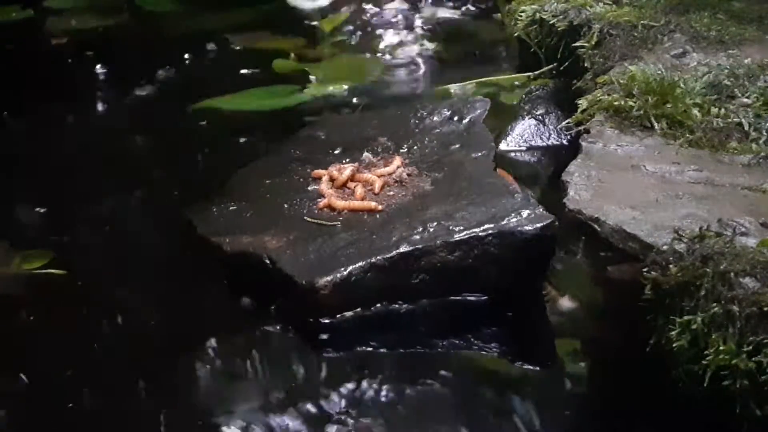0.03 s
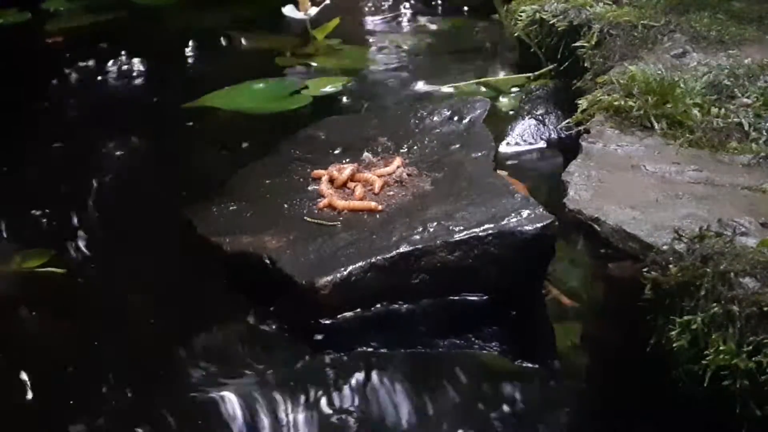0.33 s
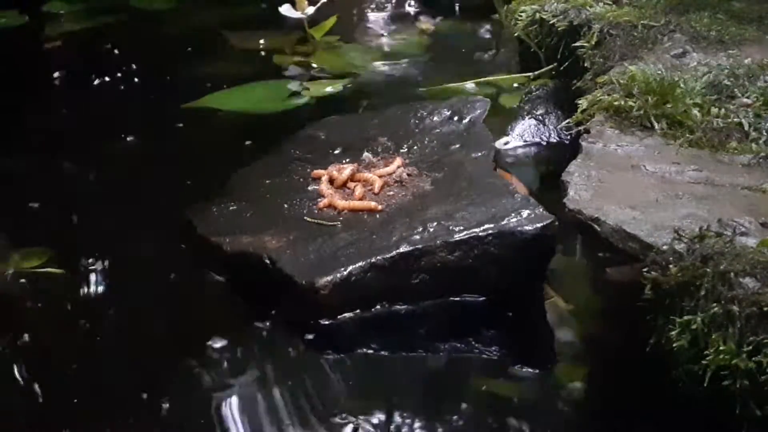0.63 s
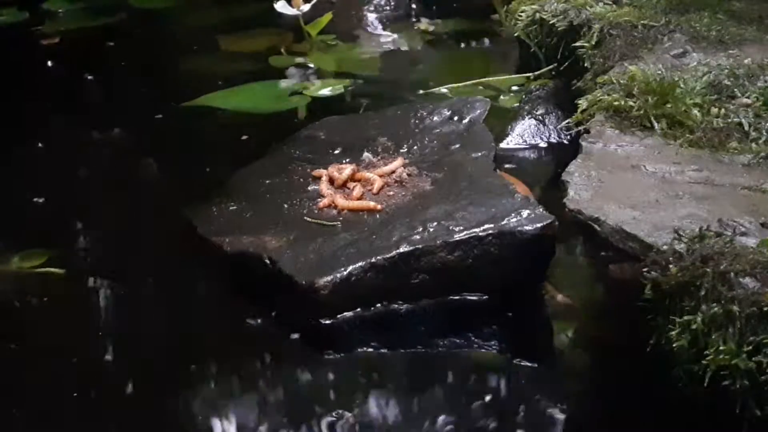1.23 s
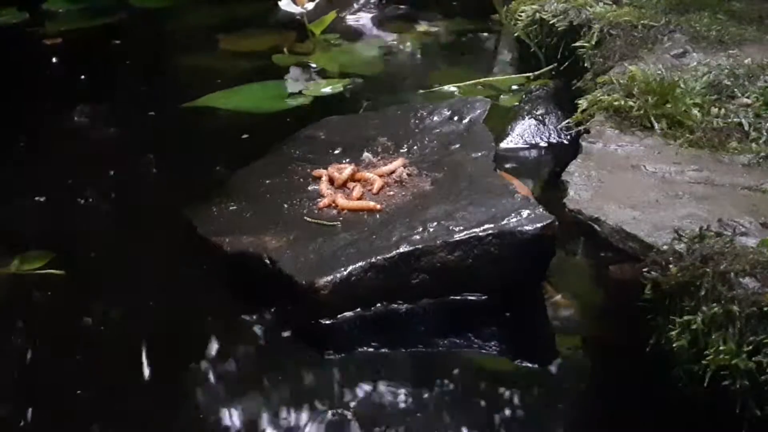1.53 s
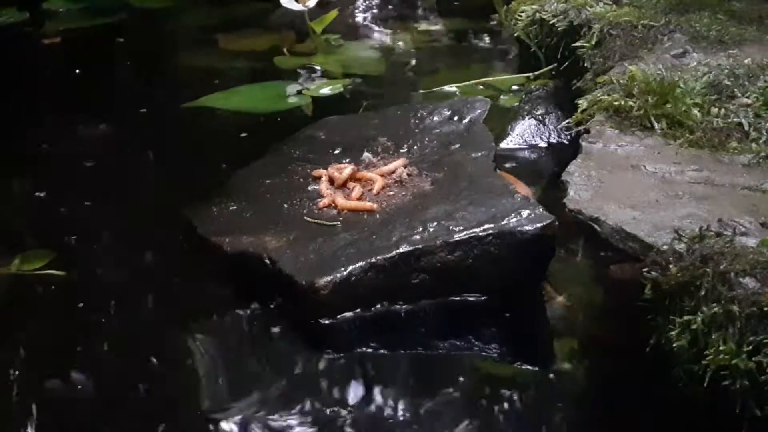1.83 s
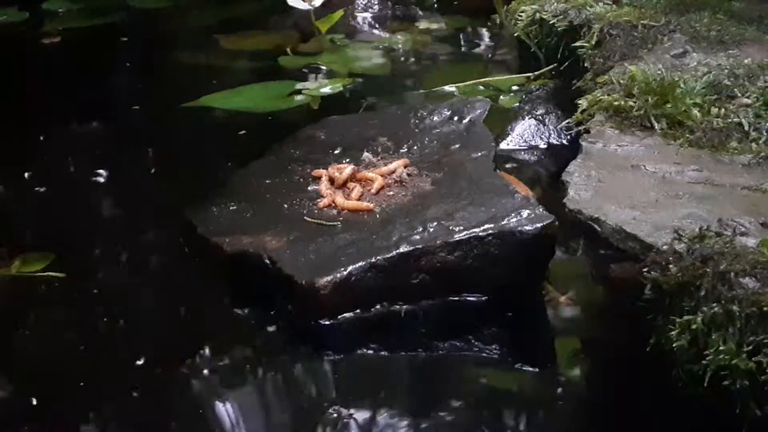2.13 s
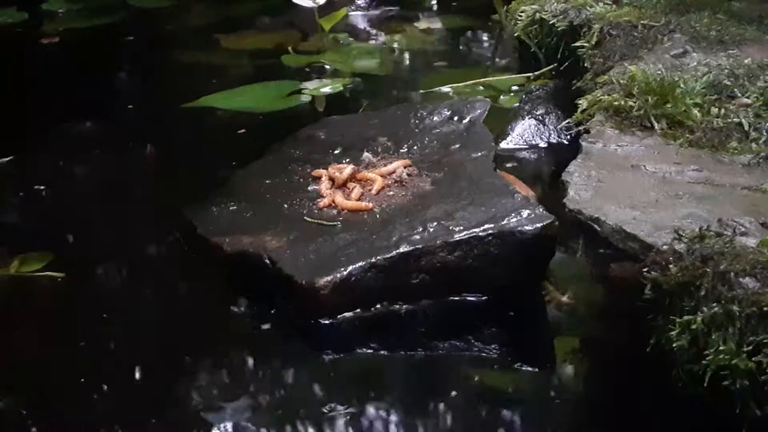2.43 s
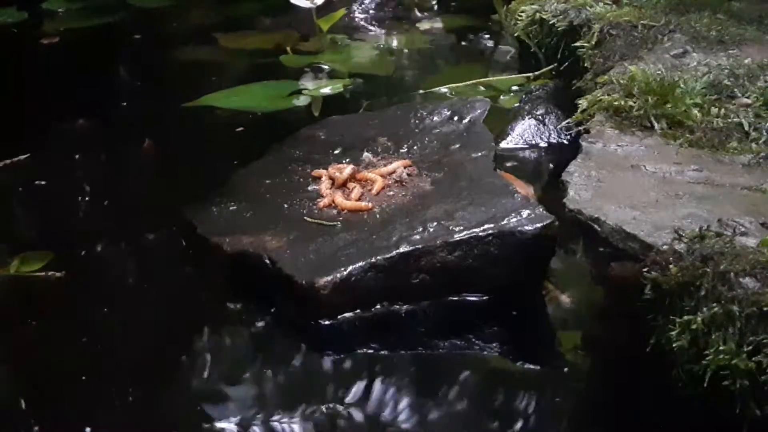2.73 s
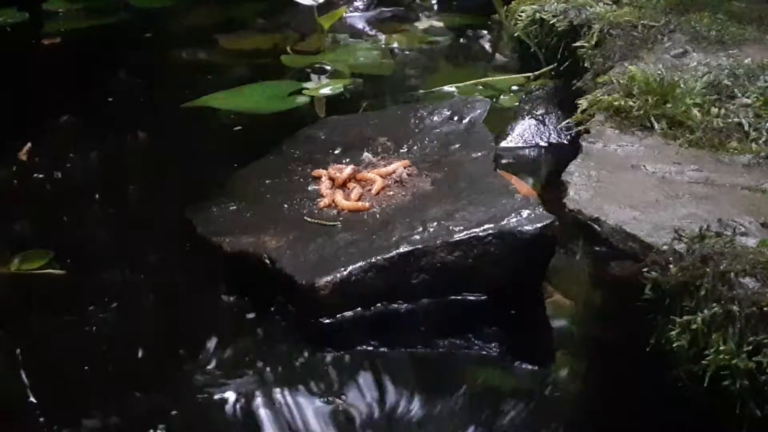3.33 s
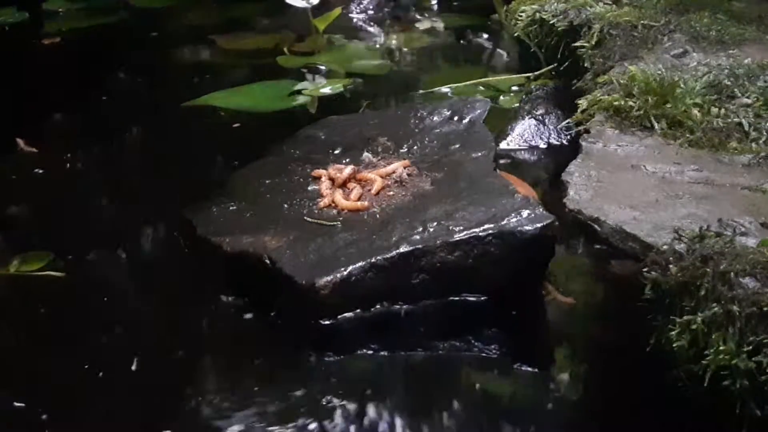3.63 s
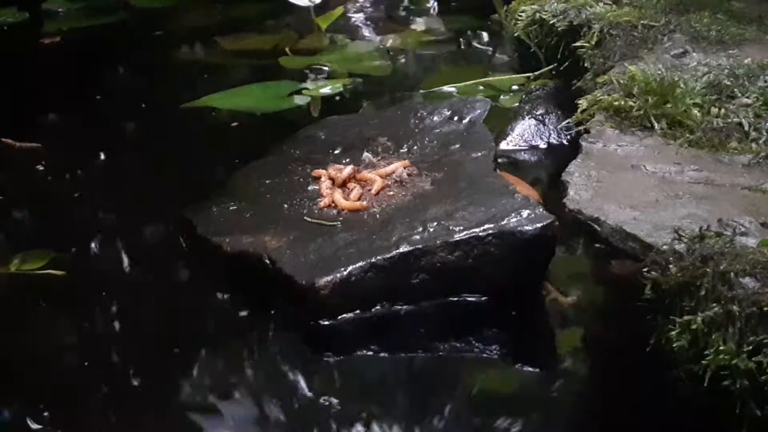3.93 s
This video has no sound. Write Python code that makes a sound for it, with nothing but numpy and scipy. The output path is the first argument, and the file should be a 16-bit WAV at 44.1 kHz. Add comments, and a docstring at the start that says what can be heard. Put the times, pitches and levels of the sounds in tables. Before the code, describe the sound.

A bullfrog bellows three times at a pond, close and slightly left, at about 1.3, 2.2 and 3.1 seconds. Each call lasts under half a second, starting gruff, then booming and rasping, with a slight echo. Tiny splashes tick in the first 0.8 seconds. Faint birds whistle far off over a low rumble, while a distant engine slowly rises in pitch and level until the end at 4 seconds.

```python
"""A low rumble, small splashes and far birds are heard first, while a distant engine gathers speed.
Then a bullfrog bellows three times at the rocky edge of a garden pond. Each call is a train of pulses
filtered by the resonances of vocal sac, throat and eardrums: it starts gruff, booms, and rasps at its
loudest. Near rocks and farther banks reflect it. A faint background hiss swells while each call sounds."""
import sys
import numpy as np
from scipy import signal
from scipy.fft import rfft, irfft
from scipy.io import wavfile
from scipy.ndimage import uniform_filter1d

SR = 44100
rng = np.random.default_rng(int(sys.argv[2]) if len(sys.argv) > 2 else 0)


def materialize(psi):
    """Save the field psi as 16-bit PCM at rate SR to the path in sys.argv[1].

    A 1-D psi becomes a single channel; in a 2-D psi each row is a channel.
    """
    bounded = np.clip(np.atleast_2d(psi).T, -1, 1)
    quanta = np.round(bounded * 32767).astype(np.int16)
    wavfile.write(sys.argv[1], SR, quanta)


N = 176400
T = np.arange(N) / SR
HZ = np.fft.rfftfreq(N, 1 / SR)


def amp(db):
    """Amplitude ratio: tenfold for every 20 dB."""
    return 10 ** (np.asarray(db) / 20)


def unit(x):
    """Normalisation to rms 1."""
    return x / np.sqrt(np.mean(x ** 2) + 1e-20)


def curve(points, hz):
    """Interpolation on a log-frequency axis."""
    f, value = np.transpose(points)
    return np.interp(np.log(hz + 1), np.log(f + 1), value)


def filtered(x, gain):
    """Linear filtering: the spectrum is multiplied by a frequency response."""
    return irfft(rfft(x) * gain, x.shape[-1])


def add(mix, start_s, sound):
    """Superposition of a sound on the mix."""
    part = mix[..., max(round(start_s * SR), 0):][..., :sound.shape[-1]]
    part += sound[..., :part.shape[-1]]


def drift(size, rate_hz):
    """Slow random modulation: low-passed noise of rms about 1."""
    return unit(filtered(rng.standard_normal(N), np.exp(-(HZ / rate_hz) ** 2)))[:size]


def ear_gains(balance):
    """Interaural level difference, split evenly between the ears."""
    return amp(np.outer([.5, -.5], curve(balance, HZ)))


def left_leads(x, lead_s):
    """Interaural time difference: a positive lead reaches the left ear first."""
    return filtered(x, np.exp(2j * np.pi * np.outer([.5, -.5], HZ) * lead_s))


def reverb(x, decay):
    """Reverberation: sparse reflections for each ear, decaying by rows of (frequency_hz, t60_s)."""
    taps = rng.standard_normal((2, SR)) * (rng.random((2, SR)) < 3000 / SR)
    taps[:, :60] = 0
    hz, t, bands = signal.stft(taps, SR, nperseg=256)
    tail = signal.istft(bands * amp(-60 * t / curve(decay, hz)[:, None]), SR)[1]
    tail /= np.linalg.norm(tail, axis=1, keepdims=True)
    return signal.fftconvolve(np.atleast_2d(x), tail, axes=1)[:, :N]


# Likeness of the surrounding sound at the two ears: frequency_hz, coherence
FIELD_COHERENCE = [(50,0.95),(200,1),(500,0.91),(1000,0.23),(2000,0.24),(4000,0.19),(15000,0.064)]
# Its balance: frequency_hz, left_minus_right_db
FIELD_BALANCE = [(60,0.6),(300,0.2),(1000,-1.5),(4000,-1),(14000,-3.5)]

def diffuse(pair):
    """Diffuse field: long waves reach both ears alike, short waves are nearly incoherent."""
    a, b = rfft(pair)
    coherence = curve(FIELD_COHERENCE, HZ)
    right = coherence * a + np.sqrt(1 - coherence ** 2) * b
    return irfft(np.array([a, right]) * ear_gains(FIELD_BALANCE), N)


def diffuse_noise(spectrum):
    """Spectral shaping of diffuse white noise, at rms 1."""
    return unit(filtered(diffuse(rng.standard_normal((2, N))), amp(curve(spectrum, HZ))))


# Spectrum of the background air: frequency_hz, relative_density_db
AIR_SPECTRUM = [(12,-83),(20,-33.5),(35,-25.5),(57,-3.5),(81,1.5),(125,-3),(162,-2),(215,-7.5),(330,-11.5),(443,-20),(750,-21.5),(1300,-25.5),(2100,-34),(3700,-34),(5600,-34),(6700,-41.5),(7900,-44.5),(10000,-42),(11600,-41),(15800,-40.5)]

def air(level_db=-46.5):
    """Ambient noise: a distant rumble under a thin, even hiss."""
    return diffuse_noise(AIR_SPECTRUM) * amp(level_db)


# Spectrum of the swelling background hiss: frequency_hz, relative_density_db
HISS_SPECTRUM = [(1500,3.5),(3500,3),(5300,-8),(7000,-1.5),(10000,-8),(15500,-12.5)]

def background_hiss(swell):
    """Amplitude modulation: a faint background hiss swells while each call sounds."""
    return swell * unit(filtered(rng.standard_normal((2, N)), amp(curve(HISS_SPECTRUM, HZ))))


# Bands of the farthest birdsong: start_s, end_s, centre_hz, width_hz, level_db
TWITTER_BANDS = [(0,0.952,3520,454,-75),(1.767,3.503,2705,100.6,-69.5),(2.003,3.554,3740,200,-70)]

def twitter(fade_s=0.2):
    """Narrow-band noise: the notes of many distant birds merge."""
    out = np.zeros((2, N))
    for start, end, centre_hz, width_hz, db in TWITTER_BANDS:
        band = filtered(rng.standard_normal((2, N)), np.exp(-.5 * ((HZ - centre_hz) / width_hz) ** 2))
        fade = np.clip(np.minimum(T - start, end - T) / fade_s, 0, 1)
        out += amp(db) * unit(band) * fade
    return out


# Far bird whistles: start_s, length_s, from_hz, to_hz, relative_level_db
BIRD_NOTES = [(0.005,0.055,2700,2735,-62.5),(0.162,0.079,3550,3600,-70),(0.175,0.068,2800,2750,-70),(.34,.08,2900,3400,-76),(0.441,.11,3970,3730,-66),(0.487,.06,3490,2580,-64.5),(0.547,.1,3870,3850,-67),(0.677,0.019,3620,3610,-60.5),(0.712,0.073,3750,2930,-68),(1.249,0.027,3980,3930,-62),(1.322,0.076,3890,4020,-68),(1.782,.1,3680,3880,-71),(2.073,0.1,3690,3960,-70),(2.558,0.24,3730,3520,-71.5),(2.88,0.12,3720,3725,-73)]

def birds(warble=.035, echo_db=3.5):
    """Frequency modulation: thin whistles glide and warble, blurred by scattering in the trees."""
    song = np.zeros(N)
    for start, length, from_hz, to_hz, db in BIRD_NOTES:
        size = int(length * SR)
        hz = np.linspace(from_hz, to_hz, size) * (1 + warble * drift(size, 190))
        whistle = np.sin(2 * np.pi * np.cumsum(hz) / SR)
        add(song, start, amp(db) * whistle * signal.windows.tukey(size, .5))
    return 1.1 * song + amp(echo_db) * reverb(song, [(3000, 0.2)])


# Course of the exhaust note: time_s, pitch_hz, level_db
EXHAUST_NOTE = [(0,262,-82),(.5,288.6,-69.5),(1,311.4,-60.5),(1.5,329.9,-58.5),(2,342.4,-56.5),(2.5,346.9,-52),(2.85,350.4,-62.5),(3.1,348,-48.5),(3.55,367.3,-47.5),(3.72,360,-47.5),(3.87,361.8,-47),(4,363.4,-49)]
# Its second and third harmonics: relative_level_db
EXHAUST_OVERTONES = [-25.5, -25]
# Spectrum of the engine's roar: frequency_hz, relative_density_db
ROAR_SPECTRUM = [(100,-18.5),(330,-1),(700,-4.5),(1200,-8.5),(2500,-17),(6000,-52.5)]

def engine(waver=0.0039, flutter_db=3.0, roar_db=-66, growth_db_per_s=3):
    """Harmonic series: a far exhaust note climbs with engine speed and flutters over a growing roar."""
    times, hz, level_db = np.transpose(EXHAUST_NOTE)
    pitch_hz = np.interp(T, times, hz) * (1 + waver * drift(N, 25.7))
    phase = 2 * np.pi * np.cumsum(pitch_hz) / SR
    note = np.sin(phase) + sum(amp(db) * np.sin(k * phase) for k, db in enumerate(EXHAUST_OVERTONES, 2))
    roar = diffuse_noise(ROAR_SPECTRUM) * amp(roar_db + growth_db_per_s * T)
    return unit(note) * amp(np.interp(T, times, level_db) + flutter_db * drift(N, 39)) + roar


# Wet ticks at the water's edge: start_s, centre_hz, width_octaves, level_db, t60_s
SPLASH_TICKS = [(.014,1870,0.35,-40,0.041),(.015,4630,0.69,-45,0.051),(.109,8550,0.7,-51.5,0.074),(.283,2120,.35,-52.5,0.047),(.416,13000,0.56,-50.5,.025),(0.449,12000,0.46,-53.5,0.038),(.49,12000,.6,-57,0.059),(.606,5900,0.13,-52.5,0.026),(0.759,5760,0.24,-54,0.027)]

def splashes(rise_s=0.00058):
    """Damped transients: each splash is a band of noise that decays exponentially."""
    out, t = np.zeros((2, N)), T[:SR // 8]
    hz = np.fft.rfftfreq(len(t), 1 / SR) + 1
    for start, centre_hz, octaves, db, t60 in SPLASH_TICKS:
        colour = np.exp(-.5 * (np.log2(hz / centre_hz) / octaves) ** 2)
        spray = unit(filtered(rng.standard_normal((2, len(t))), colour))
        add(out, start, spray * np.minimum(t / rise_s, 1) * amp(db - 60 * t / t60))
    return out


# Resonances of sac, throat and eardrums at the pulse rate REST_HZ: frequency_hz, gain_db
RESONANCES = [(60,-43.5),(120,-29),(245,-22.5),(300,-25.5),(360,0),(400,-0.5),(480,-11),(540,-12),(605,-15.5),(660,-23.5),(730,-40.5),(830,-29.5),(900,-23),(970,-11.5),(1080,-18.5),(1220,-25),(1330,-17),(1450,-15),(1580,-14.5),(1690,-22.5),(1820,-37),(2020,-24),(2150,-28),(2270,-28.5),(2380,-53),(2560,-39),(3100,-60.5),(4200,-78.5),(8000,-87)]
# How far each resonance follows the pitch: frequency_hz, tracking_share
PITCH_TRACKING = [(400,0.34),(1000,0.05),(1450,0.94),(2300,0.24)]
REST_HZ = 121

def pulses(cycles, rate_hz, sweep_s_per_khz=0.0017):
    """Source and filter: the harmonics of a pulse train are weighted by the frog's resonances."""
    k = np.arange(1, 50)[:, None]
    harmonic_hz = k * REST_HZ
    # dispersion: within a pulse the high tones come first
    sweep = sweep_s_per_khz * (harmonic_hz ** 2 / 2000 - harmonic_hz)
    tuning = (rate_hz / REST_HZ) ** curve(PITCH_TRACKING, harmonic_hz)
    colour = amp(curve(RESONANCES, k * rate_hz / tuning))
    return (colour * np.cos(2 * np.pi * (k * cycles + sweep))).sum(0)


def puffs(cycles, hz, spread_cycles=0.39, highpass_hz=800, gain_db=-4):
    """Gated turbulence: air let through with each pulse excites the same resonances."""
    gate = np.exp(-.5 * (((cycles + .5) % 1 - .5) / spread_cycles) ** 2)
    breath = unit(gate * rng.standard_normal(len(cycles)))
    treble = 1 / (1 + (highpass_hz / (hz + 1)) ** 4)
    return filtered(breath, amp(curve(RESONANCES, hz)) * treble) * amp(gain_db) * np.sqrt(SR / REST_HZ) / 2


# Offsets to the four bands of a call: boom_db, bellow_db, throat_db, rasp_db
BAND_TRIMS = [-0.67, 0.42, -1.6, 1]

def voice_bands(voice, hz, envelopes_db, crossovers_hz=(445, 800, 1250), weak_db=-54.5):
    """Band envelopes: boom, bellow, throat and rasp are each levelled, then given their own contour."""
    lowpasses = [1 / (1 + (hz / top) ** 40) for top in crossovers_hz]
    passbands = np.diff(lowpasses, axis=0, prepend=0, append=1)
    bands = []
    for passband, envelope_db, trim_db in zip(passbands, envelopes_db, BAND_TRIMS):
        band = filtered(voice, passband)
        power = uniform_filter1d(uniform_filter1d(band ** 2, size=1060), size=720)
        db = envelope_db + trim_db
        db += .3 * np.minimum(db - weak_db, 0)  # a weak band dies away faster
        bands.append(band / np.sqrt(abs(power) + 1e-12) * amp(db))
    return bands


def croak(rows, jitter=0.016, shimmer=0.043, limp_cycles=0.02, limp_depth=0.14, hiss_db=-54):
    """Period tripling: pulses limp in threes, then clear. Gives start, four bands and background swell."""
    times, rates, *levels = np.transpose(rows)
    t = T[(T > times[0] - .02) & (T < times[-1] + .02)]
    size, rate_hz = len(t), np.interp(t, times, rates)
    hz = np.fft.rfftfreq(size, 1 / SR)
    progress = (t - times[0]) / (times[-1] - times[0])
    gruff = np.clip((0.57 - progress) / 0.23, 0, 1)  # clear just past the middle
    cycles = np.cumsum(rate_hz * (1 + jitter * drift(size, 90))) / SR
    limp = gruff * np.exp(2j * np.pi * cycles / 3)
    cycles += limp_cycles * limp.imag
    voice = pulses(cycles, rate_hz) + puffs(cycles, hz) * (.5 + .5 * gruff)
    voice *= 1 + limp_depth * limp.real + shimmer * drift(size, 180)
    envelopes_db = [np.interp(t, times, level) for level in levels]
    swell = amp(hiss_db + 0.41 * (envelopes_db[-1] - max(levels[-1])))  # background hiss follows the rasp
    swell *= 1 + 0.29 * np.cos(2 * np.pi * cycles)
    parts = np.array([*voice_bands(voice, hz, envelopes_db), swell])
    return t[0], parts * signal.windows.tukey(size, .1)


# One table per call, levels before trimming: time_s, pulse_rate_hz, boom_db, bellow_db, throat_db, rasp_db
CALLS = [
    [(1.28, 138.1, -63, -68.5, -68, -85), (1.338, 131.7, -38, -47.5, -51.5, -60.5),
     (1.394, 127.3, -27.5, -38.5, -44.5, -41), (1.444, 122.8, -26.5, -31, -37.5, -37),
     (1.502, 122.2, -25, -33, -35.5, -35), (1.54, 120.1, -26.5, -29.5, -38, -39.5),
     (1.578, 119.4, -28, -33.5, -47, -47.5), (1.624, 124.6, -31.5, -44.5, -56, -65.5),
     (1.69, 129.1, -37, -49.5, -59, -64), (1.72, 123.6, -50, -64, -67, -77)],
    [(2.2, 150, -54, -50.5, -63, -64.5), (2.23, 151.2, -47, -58.5, -58.5, -70),
     (2.26, 143.2, -39.5, -49, -48.5, -59), (2.286, 132.5, -28.5, -42, -46.5, -50),
     (2.328, 131.6, -20.5, -31.5, -40.5, -38), (2.38, 121.9, -19.5, -32.5, -30, -36),
     (2.422, 122.1, -20, -32, -36.5, -38), (2.466, 117.3, -24.5, -30, -36, -41.5),
     (2.51, 122.7, -26.5, -40.5, -49.5, -63), (2.582, 130.4, -34, -53.5, -65, -60.5),
     (2.62, 132, -64, -58, -71, -76)],
    [(3.09, 146.5, -49, -61.5, -67.5, -70), (3.132, 143.6, -44, -56, -56, -61),
     (3.184, 134, -26, -37.5, -42, -49.5), (3.232, 133.5, -22, -33, -41.5, -35),
     (3.286, 129.6, -17.5, -27.5, -37.5, -35), (3.3, 126.1, -18.5, -37.5, -37, -34.5),
     (3.336, 118.7, -22.5, -32.5, -34, -41.5), (3.378, 118.2, -27.5, -33.5, -42.5, -46),
     (3.44, 127, -34.5, -52, -63, -66), (3.46, 130.6, -33.5, -51, -61, -58),
     (3.48, 130.4, -50, -66, -64, -71)],
]
# Balance of the frog's direct sound: frequency_hz, left_minus_right_db
FROG_BALANCE = [(120,2),(370,4),(480,2),(700,0.5),(980,13),(1120,-7.5),(1300,14),(1460,-16.5),(1600,-8.5),(1750,4.5),(2150,-3),(2600,19),(6000,-5)]
# Reverberation of the pond's banks: frequency_hz, t60_s
BANK_DECAY = [(100,0.9),(400,0.22),(1000,0.37),(2500,0.083),(10000,0.099)]

def bullfrog(lead_s=0.00014, rocks_db=-9, rocks_t60_s=0.027, banks_db=-18.5):
    """Direct and reflected sound: three calls a little to the left, scattered by rocks and banks."""
    parts = np.zeros((5, N))
    for rows in CALLS:
        add(parts, *croak(rows))
    boom, bellow, throat, rasp, background_swell = parts
    voice = boom + bellow + throat + rasp
    direct = left_leads(filtered(voice, ear_gains(FROG_BALANCE)), lead_s)
    rocks = reverb(throat + rasp, [(1000, rocks_t60_s)])
    banks = diffuse(reverb(voice, BANK_DECAY))
    return direct + amp(rocks_db) * rocks + amp(banks_db) * banks, background_swell


def scene():
    """Superposition of all sources; rumble and engine reach the right ear first."""
    frog, swell = bullfrog()
    background = background_hiss(swell) + left_leads(air() + engine(), lead_s=-0.000375)
    return background + birds() + twitter() + splashes() + frog


def record(dry, cutoff_hz=15900):
    """Band limiting by a steep low-pass filter."""
    lowpass = signal.firwin(511, cutoff_hz, window=("kaiser", 9), fs=SR)
    return signal.oaconvolve(dry, lowpass[None], "same")


dry = scene()
out = record(dry)
materialize(out)
```